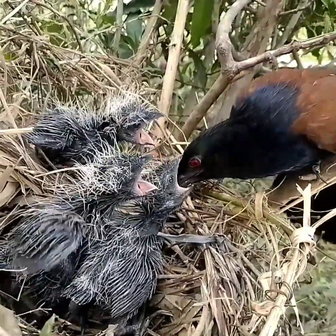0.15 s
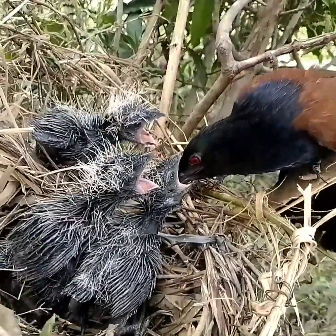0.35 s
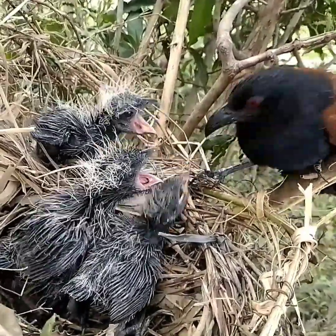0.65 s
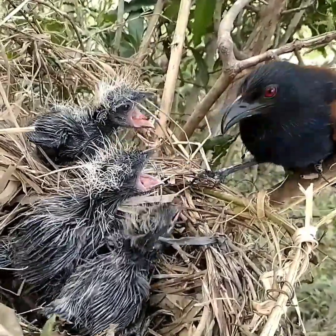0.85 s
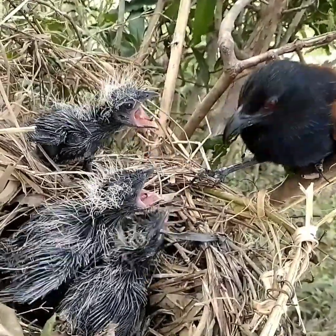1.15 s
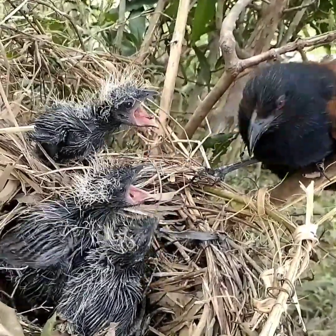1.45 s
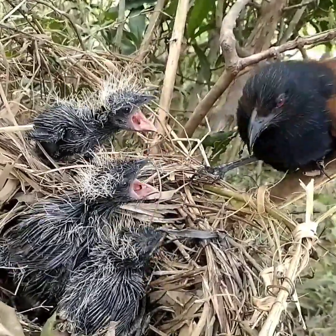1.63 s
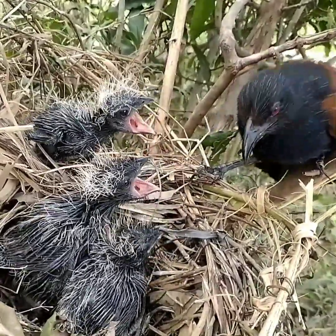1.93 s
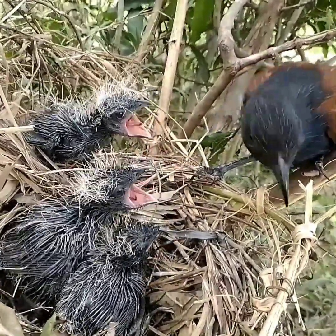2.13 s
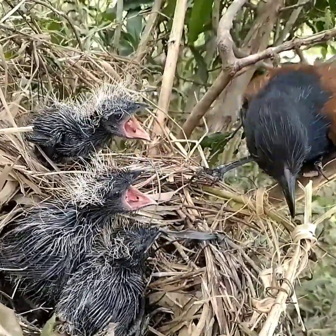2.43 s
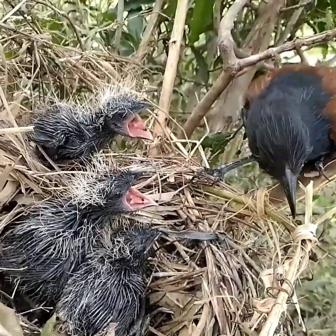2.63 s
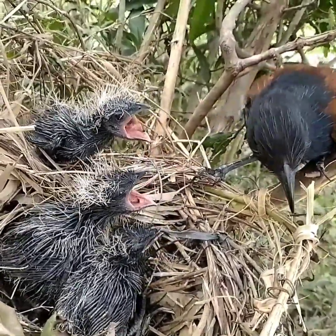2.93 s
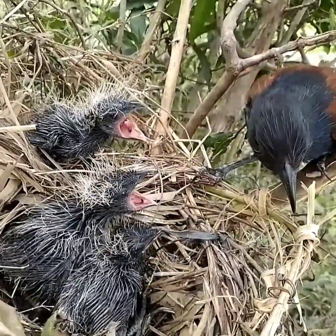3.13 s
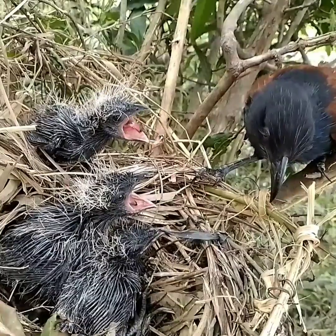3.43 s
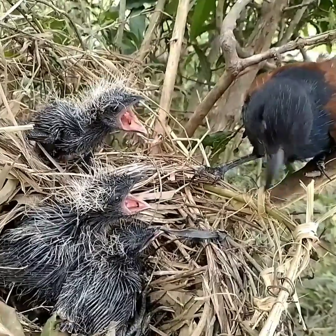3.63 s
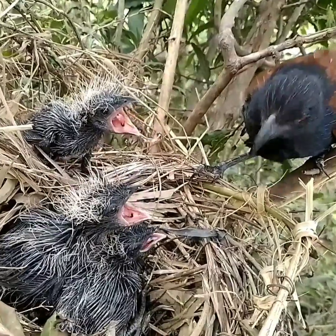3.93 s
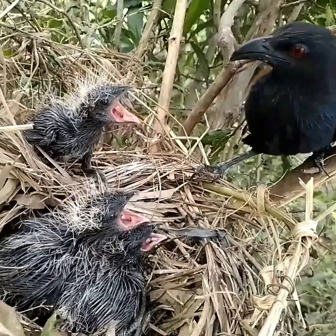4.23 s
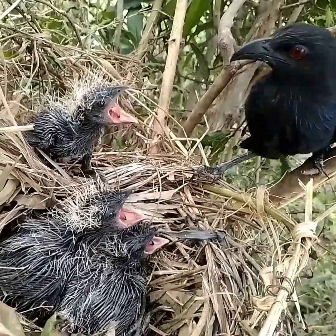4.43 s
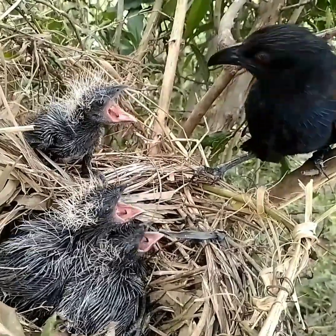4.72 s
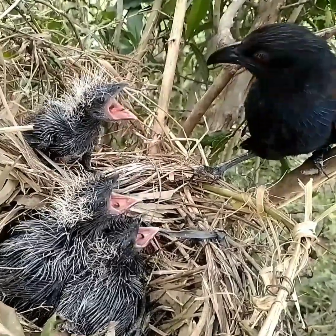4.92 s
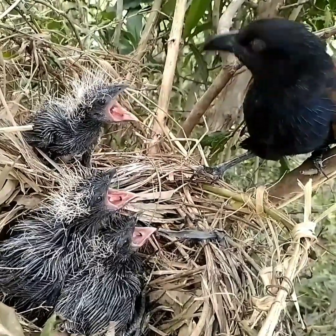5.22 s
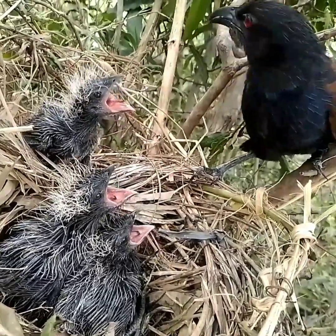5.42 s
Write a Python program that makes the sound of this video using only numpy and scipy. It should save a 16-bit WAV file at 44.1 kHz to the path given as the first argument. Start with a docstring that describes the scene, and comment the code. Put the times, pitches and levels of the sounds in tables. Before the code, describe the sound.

Close outdoor stereo sound of several nestlings begging continuously for about five and a half seconds. From the first instant a long rasping hiss sounds, with a thin wheeze and soft dull nest rustles until about 0.3 s. Then overlapping hisses follow at three to four a second, each a quarter to half a second, swelling quickly and dying away. They are bright, breathy and slightly wet, with a narrow whistling throat edge high up and a rougher rush below. Tiny gliding squeaks cluster near 0.6 and 0.8 s, stand out at 1.95 s and return around 3.1 s. Near 2.2 s two very short hisses stutter before fuller ones; stronger pulses come around 2.4-2.6, 3.5 and 4.0 s. Lower-toned squeaks appear near 4.1 and 4.6 s. Muffled grass crunches occur around 1.9, 2.6-2.8 and 4.9 s. Calls continue to the end over faint, stirring thicket air, with only a short leafy scatter.

```python
"""Begging nestlings

Nestlings beg from a parent at a grass nest in a thicket, close by. Their overlapping calls are rasping
hisses: noise shaped by a throat and a beak resonance. Short gliding tones make squeaks, narrow noise thin wheezes.
Wings and feet rustle in the dry nest as bursts of dull noise, over the faint noise of the thicket air."""
import sys
import numpy as np
from scipy import signal
from scipy.fft import rfft, irfft, next_fast_len
from scipy.io import wavfile
from scipy.ndimage import map_coordinates

SR = 44100
rng = np.random.default_rng(int(sys.argv[2]) if len(sys.argv) > 2 else 0)


def to_wav(s):
    """Save 16-bit WAV."""
    ch = np.atleast_2d(s).T  # columns
    pcm = np.round(np.clip(ch, -1, 1) * 32767)  # PCM
    wavfile.write(sys.argv[1], SR, pcm.astype(np.int16))


N = 245637
FFT_SIZE = next_fast_len(N, real=True)

# Noise colours of the bright hiss, the lower rush and the wide open mouth: [f/Hz, relative level/dB]
HISS_COLOUR = [(2000, -62), (4500, -28), (5800, -2), (6400, 10), (6900, 9.5), (7400, 11.5), (8200, 12),
               (9400, 7), (10700, 4.5), (11250, 4.5), (12300, -2), (14000, -4.5), (16000, -78)]
RUSH_COLOUR = [(700, -54), (1500, -39), (2400, -12.5), (3400, -7), (3900, -5), (4250, -9), (4900, -2),
               (5600, -0.5), (6500, 4), (8000, -18.5)]
GAPE_COLOUR = [(150, -30), (220, -11.5), (350, -10), (500, -7), (1000, 2), (1250, -1.5), (1480, -7),
               (1900, 4.5), (2300, 1.5), (2900, -21.5)]
# Resonances of a chick's head; the throat is then slid to the pitch of each call
THROAT_HZ, THROAT_WIDTH_HZ = 6680, 490
BEAK_HZ, BEAK_WIDTH_HZ = 10190, 800
WANDER_HZ = 54.3  # typical unsteadiness of the throat
TREBLE_HZ = 8300  # above this the hiss has its own loudness


def hisses():
    """Air forced through the syrinx (the voice organ) flutters and excites the throat and the open beak."""
    (hiss_gain, throat_gain, beak_gain, rush_gain, treble_gain), throat_hz = begging()
    flutter = rasp(rate=30, depth_db=0.62)

    jet = from_db(5.0) * turbulence(colour(HISS_COLOUR))
    treble_spectrum = rfft(jet, FFT_SIZE) / (1 + (TREBLE_HZ / bin_hz()) ** 10)
    treble = irfft(treble_spectrum, FFT_SIZE)[:, :N]
    jet = hiss_gain * (jet - treble) + treble_gain * treble

    throat = turbulence(resonance(THROAT_HZ, THROAT_WIDTH_HZ))
    throat = slide(throat, throat_hz - THROAT_HZ + WANDER_HZ * drift(12))
    throat = throat_gain * from_db(-1.9) * throat * rasp(rate=130, depth_db=1.6)

    beak = turbulence(resonance(BEAK_HZ, BEAK_WIDTH_HZ))
    beak = beak_gain * from_db(4.0) * beak * rasp(rate=24, depth_db=2.5)
    bright = reflections(jet + throat + beak, rate=7.8, echo_db=-2.5, nearest_s=.0005, farthest_s=.008)

    # a lower rush, noise mixed with short tones, lies under the bright hiss
    rush = from_db(-0.88) * turbulence(colour(RUSH_COLOUR)) * rasp(rate=120, depth_db=0.93)
    rush = rush + from_db(-5.0) * tonal_grains()
    rush = reflections(rush, rate=9.2, echo_db=9.0, nearest_s=.0004, farthest_s=.006)
    rush = rush_gain * sway(rush)

    # the wide mouth blows softly below that
    gape = turbulence(colour(GAPE_COLOUR))
    gape = reflections(gape, rate=6.0, echo_db=5.5, nearest_s=0.000994, farthest_s=.008)
    gape = from_db(-33.0) * rush_gain ** 0.72 * gape * rasp(rate=64, depth_db=1.0)

    unevenness = flutter * rasp(rate=240, depth_db=0.5) * airflow() * spits()
    return unevenness * (bright + rush) + gape


# Begging calls: [start t/s, attack/s, end of the push after the start/s, length/s, hiss level/dB,
# throat f/Hz, then levels relative to the hiss: throat/dB, beak/dB, low rush/dB, treble/dB,
# and pan: level/dB added on the left and taken off on the right]
BEGGING_CALLS = [(.004, 0.019, .18, 0.52, -30.5, 6980, 5.5, -12, -0.5, 4.5, -1),
                 (0.287, 0.044, 0.099, .28, -28.5, 7010, 1.5, -28, -1.5, 5, -0.5),
                 (0.558, 0.0045, 0.091, .26, -31.5, 6900, 4, -7, 1, 0.5, 1),
                 (0.634, .017, .11, 0.26, -28.5, 6660, 1, -8, -1, 2, -1),
                 (0.76, 0.021, 0.075, 0.37, -30.5, 6920, 5.5, -5, -2, 1.5, -1),
                 (0.893, 0.035, 0.098, .29, -28, 6780, -1.5, -9, -0.5, 3, -0.5),
                 (1.169, 0.0063, 0.09, .22, -31.5, 6680, 1, -4, 2, 5.5, 0.5),
                 (1.198, 0.015, 0.057, 0.24, -29.5, 6800, 5.5, -11, .5, 2, -.5),
                 (1.394, 0.04, 0.15, .47, -28.5, 6820, 2.5, -12, -0.5, 4.5, -0.5),
                 (1.694, 0.0084, 0.12, 0.25, -30.5, 7020, 4.5, -3.5, 3.5, 4, -0.5),
                 (1.898, .012, 0.19, .36, -31, 7060, 2.5, -8, 0, 5, -.5),
                 (2.168, .008, 0.01, .07, -30, 7000, -4, -16, -1, -2, -1),
                 (2.198, .007, 0.019, 0.066, -30.5, 6910, 1, -12, 7, 2, -2.5),
                 (2.249, 0.0062, .14, 0.27, -30, 7130, 3, -12, -1.5, 4, -0.5),
                 (2.352, 0.072, 0.1, 0.285, -27.5, 7050, 4, -11, -3, 3.5, -1.5),
                 (2.523, 0.051, .088, 0.19, -27, 7150, 4, -19, 1, 4, -.5),
                 (2.637, .008, 0.094, 0.34, -33.5, 6870, -4.5, -7.5, 0.5, 5, -1),
                 (2.796, 0.045, 0.13, 0.36, -30.5, 7160, 2, -9, 3, 5, -1),
                 (3.03, 0.031, 0.12, 0.24, -29, 6990, 1, -8, 0.5, 3, -0.5),
                 (3.256, 0.012, .02, .079, -41, 6980, 1, -15, -6.5, 2, -0.5),
                 (3.317, 0.0027, .11, .263, -32, 7050, 4.5, -6.5, 2.5, 1.5, -1.5),
                 (3.4, .01, 0.12, .2, -29.5, 7090, -3.5, -4.5, 0, 5.5, -0.5),
                 (3.533, 0.023, 0.085, .233, -26, 7330, -2.5, -4.5, -1.5, 1.5, -2),
                 (3.68, 0.0243, 0.078, 0.168, -30.5, 6615, -4, -12, -6, 4.5, -1),
                 (3.815, 0.0037, 0.1, .22, -31.5, 6980, 2, -2, 2.5, 2.5, -2),
                 (3.935, .11, 0.17, 0.33, -26.5, 6800, 3.5, -3, 1, 4, -1.5),
                 (4.297, 0.0062, .073, 0.08, -32.5, 6870, 0, -3, -1.5, 3.5, -1),
                 (4.312, .021, .13, .33, -31, 6864, 1, -8, 1, 5, -1.5),
                 (4.485, 0.075, 0.14, .281, -29, 6896, 0.5, -3, 0, 1.5, -1.5),
                 (4.655, .019, 0.14, 0.31, -33, 6730, -2, -8, 0, 5.5, -1.5),
                 (4.809, 0.025, 0.16, 0.33, -32.5, 6710, 5.5, -3.5, 2.5, 6, -1.5),
                 (5.028, 0.04, 0.11, 0.19, -31, 6745, 5.5, -4.5, 1.5, 4, -2),
                 (5.177, 0.027, .29, 0.26, -33, 7080, 2, -5, 2.5, 7, -1.5),
                 (5.34, 0.024, .15, .258, -31.5, 6820, 1.5, -4.5, -0.5, 1, -1.5),
                 (5.48, .022, 0.089, .21, -31.5, 6890, -3.5, -7, -2, 4.5, -1.5)]
# just after the start the beak is still shut, so its resonance and the rush are weaker
OPEN_S, SHUT_BEAK_DB, SHUT_RUSH_DB = 0.015, -10.5, -9
# a call sags from its start, fades to a weak tail after the push, and closes at its end
SAG_DB_PER_S, FADE_DB_PER_S, TAIL_DB, CLOSE_S = 10.5, 117, -37, 0.0491
TENSION_HZ = 60.2  # the throat drops towards this much lower as a call fades
DULLING = 0.27  # extra power of the fade on beak and treble, so they die sooner


def begging():
    """Each call swells, sags, fades and dulls; overlaps add in power. Gives part gains and throat pitch."""
    power = np.full((5, 2, N), 1e-12)  # hiss, throat, beak, rush, treble; left and right
    weight, pitch = np.full(N, 1e-18), np.zeros(N)
    tail = from_db(TAIL_DB)
    for (start, attack, push, length, db, throat_hz,
         throat_db, beak_db, rush_db, treble_db, pan_db) in BEGGING_CALLS:
        at = np.arange(max(int(start * SR), 0), min(int((start + length) * SR), N))
        t = at / SR - start
        fade = tail + (1 - tail) * from_db(-FADE_DB_PER_S * np.maximum(t - push, 0))
        swell = np.clip(t / max(attack, 1 / SR), 0, 1)
        closing = np.clip((length - t) / CLOSE_S, 0, 1)
        effort = swell * closing * from_db(db - SAG_DB_PER_S * t) * fade
        shut = np.exp(-t / OPEN_S)
        dull = fade ** DULLING
        parts = effort * np.array([
            np.ones_like(t),
            np.full_like(t, from_db(throat_db)),
            from_db(beak_db + SHUT_BEAK_DB * shut) * dull,
            from_db(rush_db + SHUT_RUSH_DB * shut),
            from_db(treble_db) * dull])
        power[:, :, at] += (parts[:, None] * from_db([[pan_db], [-pan_db]])) ** 2
        # where calls overlap, the stronger throat counts for more of the pitch
        weight[at] += parts[1] ** 2
        pitch[at] += parts[1] ** 2 * (throat_hz - TENSION_HZ * (1 - fade))
    return np.sqrt(power), pitch / weight


# Brief changes of the airflow, dips below 0 dB and lifts above:
# [middle t/s, time from the middle to 1/e of the change/s, level/dB]
BRIEF_CHANGES = [(.154, 0.0045, -4), (0.168, 0.0036, -3), (0.551, 0.0038, -12), (1.92, .004, 2),
                 (2.243, .005, -2), (3.248, 0.0058, -7), (3.313, 0.0033, 5), (4.314, .004, 4),
                 (4.841, .004, -3), (4.903, .006, -5.5)]
# Short extra pushes of air: [middle t/s, time from the middle to 1/e of the push/s, level/dB]
AIR_PUSHES = [(.94, 0.01, 3), (1.456, .008, 2.5), (1.755, .018, 3.5), (2.579, .008, 2.5),
              (2.881, 0.009, 4.5), (3.37, 0.0077, 4.5), (3.561, 0.0081, 2), (3.915, .012, 3.5),
              (4.354, 0.015, 3.5), (5.41, .01, 3.5)]


def airflow():
    """The flow of air is pushed or choked for a moment, as smooth bumps in its level."""
    t = np.arange(N) / SR
    changes = AIR_PUSHES + BRIEF_CHANGES
    return from_db(sum(db * np.exp(-((t - s) / half_length) ** 2) for s, half_length, db in changes))


REFERENCE_HZ = 2516  # reference pitch of grains and squeaks
GRAINS_PER_S, GRAIN_S = 130, 0.029
GRAIN_RANGE_OCT, GRAIN_GLIDE = .9, 0.052  # full spread of pitch; full spread of glide, as a share of pitch


def tonal_grains():
    """Random short gliding tones with four harmonics, mixed into the rush; rms 1."""
    out = np.zeros(N + SR)
    for when, pitch, size, glide in rng.random((int(GRAINS_PER_S * N / SR), 4)):
        along = np.linspace(0, 1, int(GRAIN_S * SR) + 2)
        start_hz = REFERENCE_HZ * 2 ** (GRAIN_RANGE_OCT * (pitch - .5))
        hz = start_hz * (1 + GRAIN_GLIDE * (glide - .5) * along)
        phase = 2 * np.pi * np.cumsum(hz) / SR
        first = int(when * N)
        tone = sum(np.sin(k * phase) for k in range(1, 5))
        out[first:first + len(along)] += size * np.sin(np.pi * along) * tone
    spectrum = rfft(out[:N], FFT_SIZE) * colour(RUSH_COLOUR) * ports(bin_hz())
    return rms_one(irfft(spectrum, FFT_SIZE)[:, :N])


SPITS_PER_S, SPIT_S, SPIT_DB = 53, 0.0068, -16  # average rate, length, strongest lift before rms scaling


def spits():
    """Wet catches in the throat lift the hiss for a moment, as a gain of rms 1."""
    catches = (rng.random(N) < SPITS_PER_S / SR) * rng.uniform(0.25, 1, N)
    bursts = signal.fftconvolve(catches, np.hanning(int(SPIT_S * SR) + 3), "same")
    return rms_one(1 + from_db(SPIT_DB) * bursts)


def rasp(rate, depth_db):
    """Uneven flutter: a randomly wandering gain of rms 1."""
    return rms_one(from_db(depth_db * np.clip(drift(rate), -2, 2)))


def slide(x, shift_hz):
    """Move a resonance up or down by a changing number of Hz."""
    turning = np.exp(2j * np.pi * np.cumsum(shift_hz) / SR)
    return np.real(signal.hilbert(x, FFT_SIZE)[:, :N] * turning)


def reflections(x, rate, echo_db, nearest_s, farthest_s, count=14):
    """Echoes off nest and chicks come and go as heads sway, combing the sound into shifting bands."""
    out, power = x.copy(), np.ones(N)
    for delay in np.geomspace(nearest_s, farthest_s, count) * rng.uniform(.9, 1.1, count):
        lag = int(delay * SR) + 1
        strength = from_db(echo_db) * drift(rate) / np.sqrt(count)
        out[:, lag:] += strength[lag:] * x[:, :-lag]
        power += strength ** 2
    return out / np.sqrt(power)  # evens out the loudness


SWAY_S = .000008  # typical swing of the delay on the left


def sway(x):
    """The heads swing, so the sound reaches the left port a little earlier or later."""
    moved = np.arange(N) + SWAY_S * SR * drift(12.0)
    return np.array([map_coordinates(x[0], [moved], order=3), x[1]])


# Squeaks: [middle t/s, length/s, strongest harmonic f/Hz, its rise over the squeak/Hz,
# level/dB before the common level, other harmonics' level/dB before their own table]
SQUEAK_CALLS = [(0.151, .012, 6780, 200, -22, -13), (0.182, .014, 7030, 404, -19.5, 1),
                (0.34, .014, 7100, 283, -16, -14), (0.568, .012, 7020, 200, -23.5, -1),
                (0.586, .010, 6950, 250, -19, -15), (0.602, .022, 6920, -100, -19.5, -6),
                (0.618, .007, 7000, 100, -21, -10), (0.769, .017, 6870, 400, -18, -6),
                (0.79, .015, 6810, 400, -19, 0), (0.823, .012, 6800, 100, -18.5, -5),
                (0.944, .012, 7260, 398, -18, -17), (1.167, .016, 7800, 1100, -31, -3),
                (1.439, .025, 6800, 200, -17.5, -10), (1.94, .014, 7130, 200, -13.5, -15),
                (1.965, .024, 7060, -100, -19, -7), (2.184, .014, 7000, -200, -19.5, -6),
                (2.227, .012, 6940, 100, -20, -7), (2.254, .018, 7030, -150, -40, -12),
                (2.27, .014, 6980, -200, -29, 3), (2.58, .016, 7020, 197, -18.5, -3),
                (3.077, .018, 7340, -300, -15.5, -1.5), (3.322, .02, 7190, -150, -20.5, -3.5),
                (3.419, .017, 7130, -200, -20, -10), (3.571, .011, 7430, 200, -17, -5),
                (4.069, .022, 5447, 50, -17, 2), (4.291, .018, 8000, 1200, -36, -2),
                (4.563, .035, 5440, 120, -20.5, 3.5), (5.086, .016, 8300, 100, -18, -2)]
# Weaker harmonics of a squeak, by their frequency: [f/Hz, level/dB]
OVERTONE_LEVELS = [(2400, -21.5), (4700, -14), (8200, -8), (9400, -4), (11000, -4), (13800, -11)]


def squeaks(jitter_hz, level_db):
    """The membrane briefly locks into an unsteady gliding tone; the throat picks out one harmonic."""
    out, wobble = np.zeros((2, N)), jitter_hz * drift(280)
    for s, length, hz, rise_hz, db, others_db in SQUEAK_CALLS:
        at = np.arange(max(int((s - length / 2) * SR), 0), int((s + length / 2) * SR))
        along = np.linspace(0, 1, len(at))
        swell = np.sin(np.pi * along)
        strongest = round(hz / REFERENCE_HZ)  # number of the strongest harmonic
        gliding_hz = hz + rise_hz * (along - .5) + wobble[at]
        phase = 2 * np.pi * np.cumsum(gliding_hz) / SR / strongest
        for k in range(1, 7):
            partial_hz = k * hz / strongest
            share_db = 0 if k == strongest else others_db + at_hz(OVERTONE_LEVELS, partial_hz)
            tone = np.real(ports(partial_hz) * np.exp(1j * k * phase))
            out[:, at] += from_db(db + level_db + share_db) * swell * tone
    return out


# Thin wheezes: [start t/s, length/s, level/dB]
WHEEZE_CALLS = [(0.005, .1, -24.5), (0.468, 0.077, -42), (1.58, 0.16, -35.5), (2.06, .13, -31.5),
                (2.725, 0.12, -36), (3.167, 0.12, -36)]


def wheezes(centre_hz, width_hz):
    """A chick gives thin wheezes: narrow air noise that swells and sinks."""
    t, effort = np.arange(N) / SR, np.zeros(N)
    for start, length, db in WHEEZE_CALLS:
        effort += from_db(db) * np.sin(np.pi * np.clip((t - start) / length, 0, 1))
    return effort * turbulence(resonance(centre_hz, width_hz))


# Bumps and wing strokes in the nest: [peak t/s, peak level/dB before the common level, 60 dB decay/s]
NEST_BUMPS = [(0.06, -47, 0.5), (0.131, -49, 0.42), (0.2, -40.5, 0.2), (1.945, -50, 0.98),
              (2.619, -50.5, 0.88), (2.845, -48.5, 0.78), (4.86, -41.5, 0.18), (4.91, -50, 0.2)]
# Noise colour of the woven grass: [f/Hz, relative level/dB]
NEST_COLOUR = [(30, -8), (110, -1), (160, -6), (220, -1), (350, 9.5), (550, -0.5), (900, 3), (1500, -58),
               (5000, -12)]


def nest_rustle(attack_s, level_db):
    """Each push on the woven grass sets off a dull crunch that dies away."""
    t, push = np.arange(N) / SR, np.zeros(N)
    for s, db, t60 in NEST_BUMPS:
        rise = np.clip((t - s) / attack_s + 1, 0, 1)
        push += rise * from_db(db - 60 * np.maximum(t - s, 0) / t60)
    return from_db(level_db) * push * turbulence(colour(NEST_COLOUR)) * rasp(rate=65, depth_db=2.5)


def thicket(x, t60, level_db, dull_hz):
    """Leaves and stems scatter the calls into a faint, short, duller tail, added to the calls."""
    t = np.arange(SR // 2) / SR
    echoes = rng.standard_normal((2, len(t))) * from_db(-60 * t / t60)
    echoes = echoes / np.sqrt(np.sum(echoes[0] ** 2))
    tail = rfft(echoes, FFT_SIZE) / (1 + (bin_hz() / dull_hz) ** 2)
    return x + from_db(level_db) * irfft(rfft(x, FFT_SIZE) * tail, FFT_SIZE)[:, :N]


# Noise colour of the thicket air: [f/Hz, relative level/dB]
AIR_COLOUR = [(25, -8), (110, 0), (160, -10), (370, 4.5), (500, -3), (1000, 1.5), (1500, -20), (4000, 1),
              (14000, -3.5)]


def thicket_air():
    """The air stirs faintly: coloured noise whose level wanders."""
    return from_db(-61) * turbulence(colour(AIR_COLOUR)) * rasp(rate=9.7, depth_db=3.5)


# How alike noise is in the two ports, held between 0 (unrelated) and 1 (same): [f/Hz, likeness]
PORT_LIKENESS = [(200, -0.03), (500, 1), (900, 0.8), (1500, 0.6), (2100, 0.34), (2600, 1.57), (3100, 4),
                 (3450, .55), (4000, 0.55), (5500, 0.06), (6600, 0.48), (8200, .5), (10000, 0.28),
                 (13000, 0)]


def turbulence(gain):
    """Filtered air noise, rms 1: part comes straight, part is scattered by leaves, unrelated per port."""
    alike = np.clip(at_hz(PORT_LIKENESS, bin_hz()), 0, 1)
    noise = np.sqrt(alike) * white(channels=1) + np.sqrt(1 - alike) * white(channels=2)
    return rms_one(irfft(gain * ports(bin_hz()) * noise, FFT_SIZE)[:, :N])


# Left minus right loudness of the two ports: [f/Hz, level/dB]
PORT_BALANCE = [(400, 1), (1000, 1), (2500, 3.5), (3100, 1), (3500, 5), (4200, 1.5), (5100, 3.5),
                (5700, -1), (6800, 11.5), (7600, 9.5), (8400, 6), (9400, -1.5), (10200, -8), (12300, -7),
                (14000, -5.5)]
# How far the left port lags behind the right: [f/Hz, phase/rad]
PORT_LAG = [(100, 0.12), (1000, 0.43), (1950, 0.72), (2350, 2.4), (3000, 3.04), (3500, 3.15), (4700, 4.48),
            (5300, 5.45), (5900, 3.9), (6900, 6.7), (7500, 7.67), (8000, 7.7), (8600, 10.2), (10000, 12.2),
            (14000, 15.4)]


def ports(hz):
    """Gain and phase with which each frequency reaches the left and right port."""
    sides = from_db(at_hz(PORT_BALANCE, hz) * np.array([[.5], [-.5]]))
    return sides * np.exp(-1j * at_hz(PORT_LAG, hz) * np.array([[1], [0]]))


def white(channels):
    """Spectra of unrelated white noises."""
    return rng.standard_normal((channels, 2 * len(bin_hz()))).view(complex)


def drift(rate):
    """Slow random wander, mostly below a rate in Hz, with rms 1."""
    spectrum = white(channels=1)[0] / (1 + (bin_hz() / rate) ** 4)
    return rms_one(irfft(spectrum, FFT_SIZE)[:N])


def resonance(centre_hz, width_hz):
    """Gain per bin of a resonance, down to half at the edges of its width."""
    return 1 / (1 + (2 * (bin_hz() - centre_hz) / width_hz) ** 2)


def colour(points):
    """Gain per bin of a noise colour."""
    return from_db(at_hz(points, bin_hz()))


def at_hz(points, hz):
    """Read a table between its points, on a log-frequency axis."""
    table = np.array(points)
    return np.interp(np.log(hz), np.log(table[:, 0]), table[:, 1])


def bin_hz():
    """Frequency of every spectral bin, at least 1 Hz so its logarithm exists."""
    return np.maximum(np.arange(FFT_SIZE // 2 + 1) * SR / FFT_SIZE, 1)


def rms_one(x):
    """Scale to rms 1 (a standard average loudness)."""
    return x / np.sqrt(np.mean(x ** 2) + 1e-20)


def from_db(db):
    """Decibels to gain."""
    return 10 ** (np.asarray(db) / 20)


def scene():
    """Chicks and nest over the faint, stirring air of the thicket."""
    chicks = hisses() + squeaks(jitter_hz=50.0, level_db=-3.0) + wheezes(centre_hz=8200, width_hz=950)
    chicks = thicket(chicks, t60=0.28, level_db=-16.5, dull_hz=3420)
    return chicks + nest_rustle(attack_s=0.046, level_db=-10.5) + thicket_air()


CUTOFF_HZ = 14280


def record(dry):
    """The top is cut steeply above the cutoff."""
    lowpass = signal.ellip(12, .1, 85, CUTOFF_HZ, fs=SR, output="sos")
    return signal.sosfilt(lowpass, dry)


dry = scene()
out = record(dry)
to_wav(out)
```